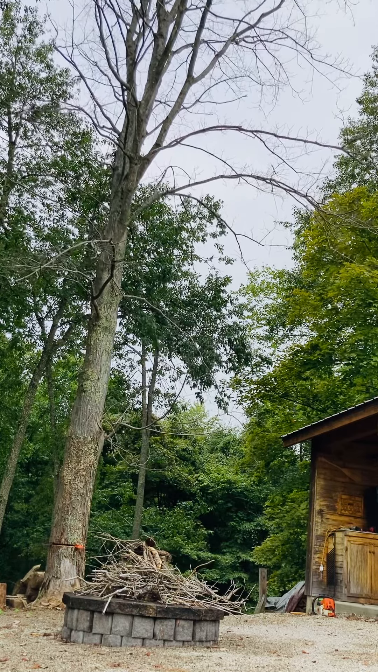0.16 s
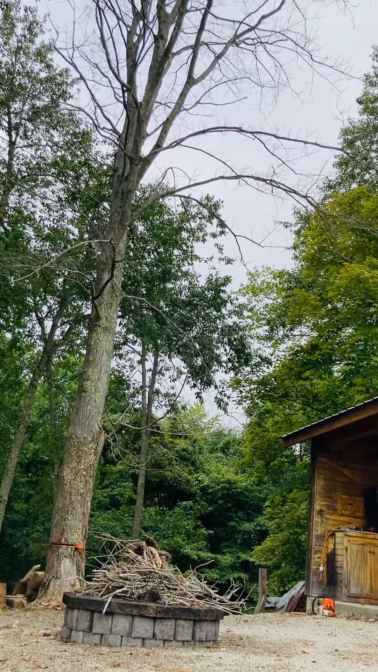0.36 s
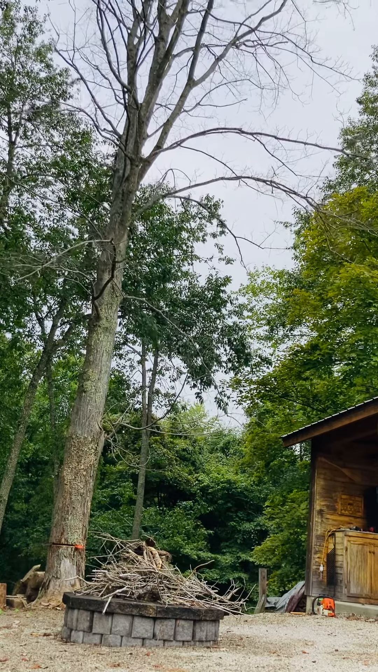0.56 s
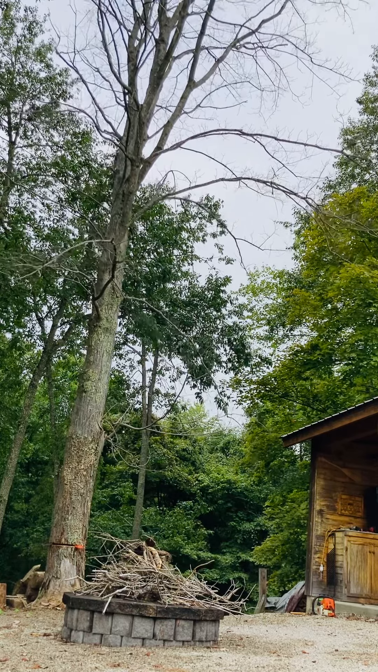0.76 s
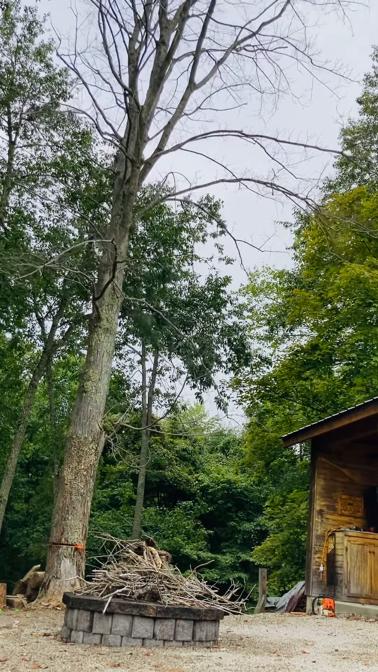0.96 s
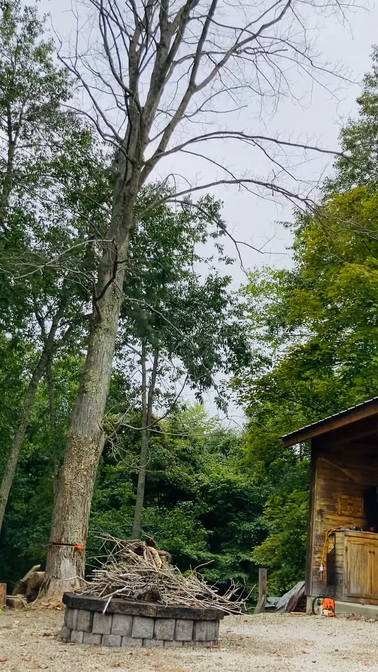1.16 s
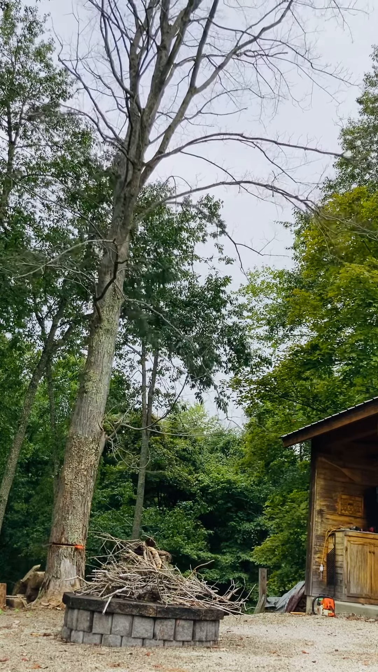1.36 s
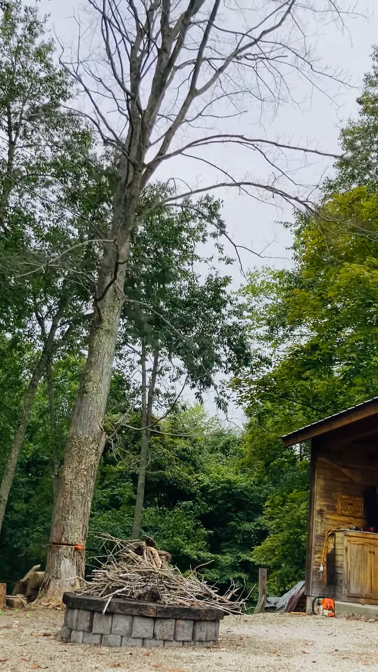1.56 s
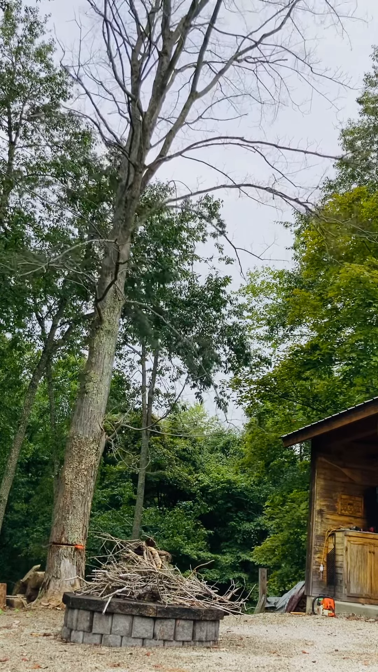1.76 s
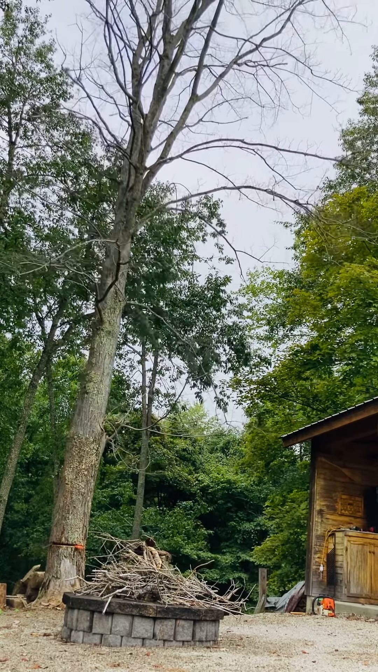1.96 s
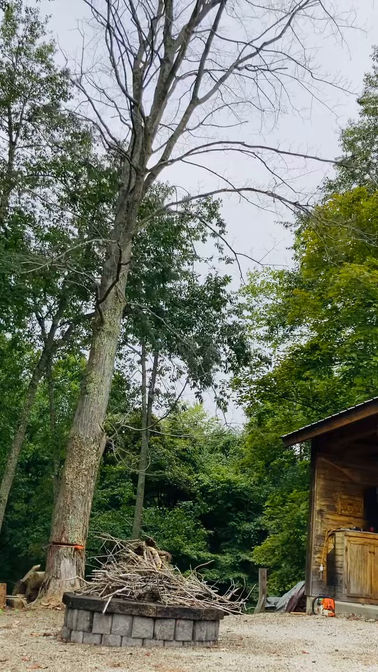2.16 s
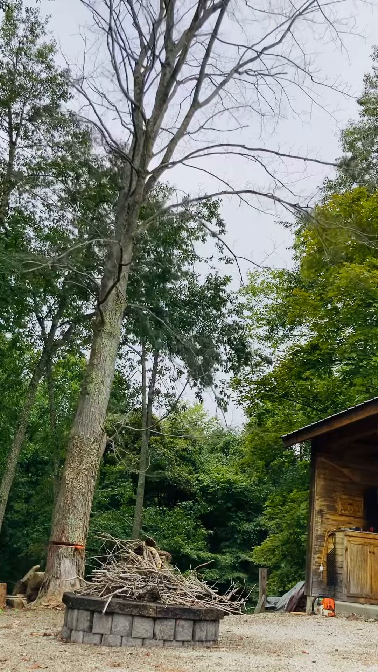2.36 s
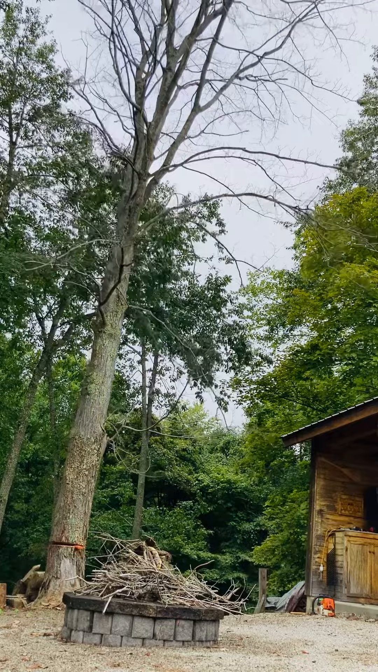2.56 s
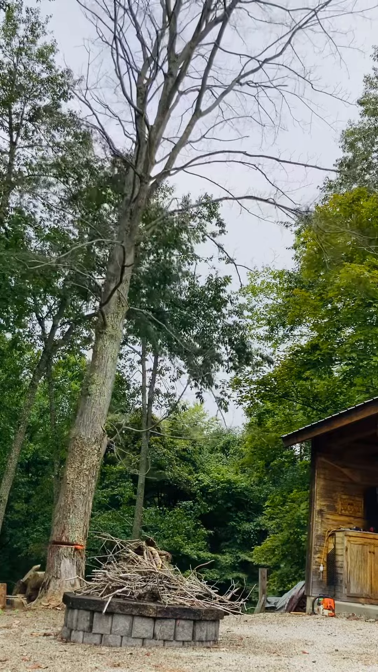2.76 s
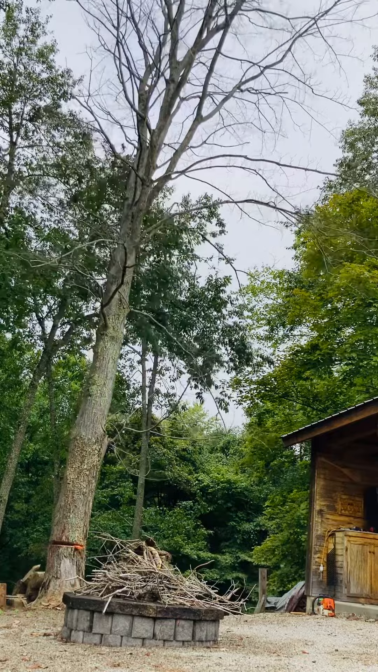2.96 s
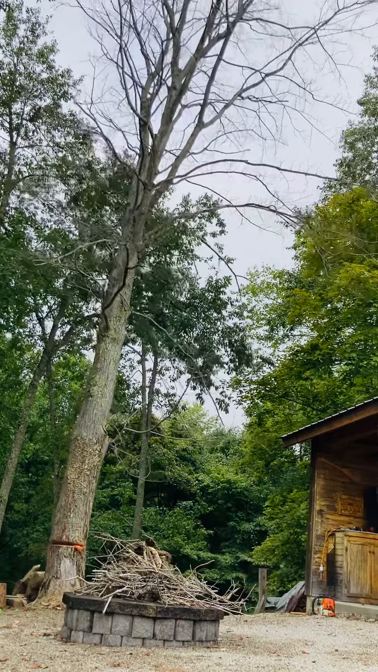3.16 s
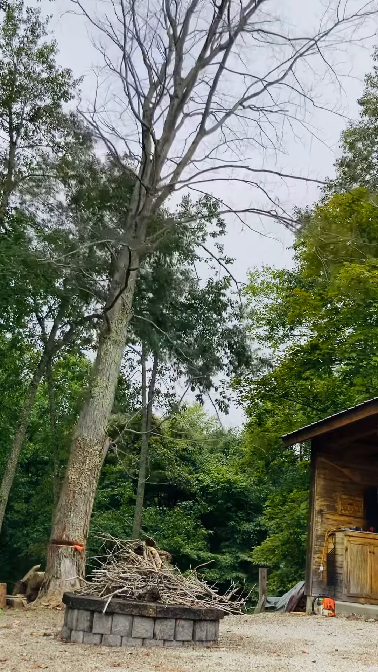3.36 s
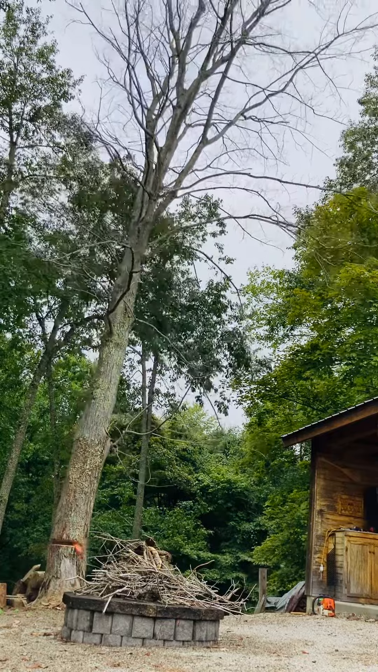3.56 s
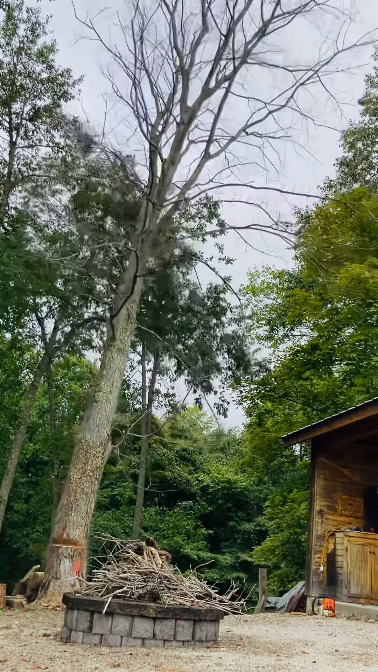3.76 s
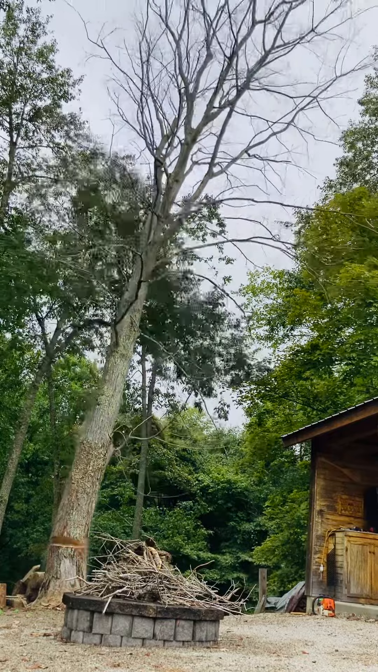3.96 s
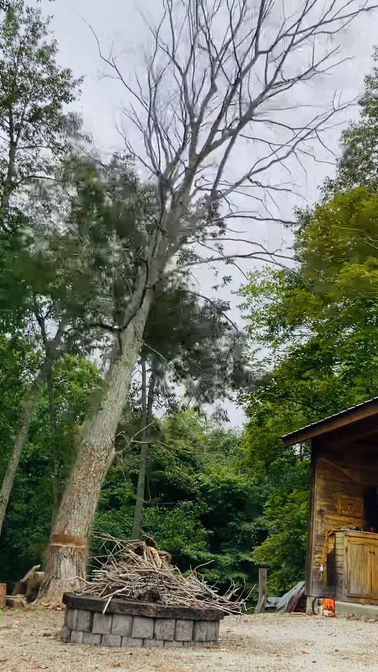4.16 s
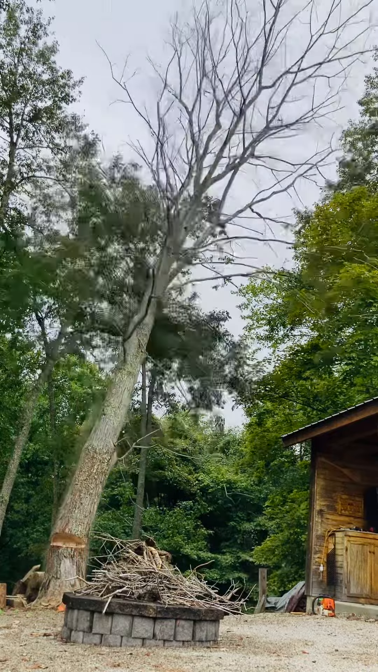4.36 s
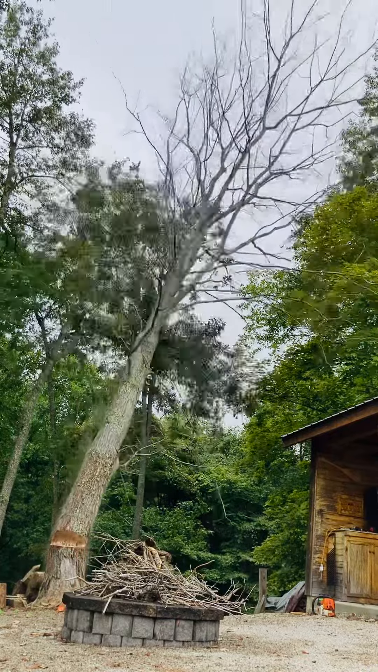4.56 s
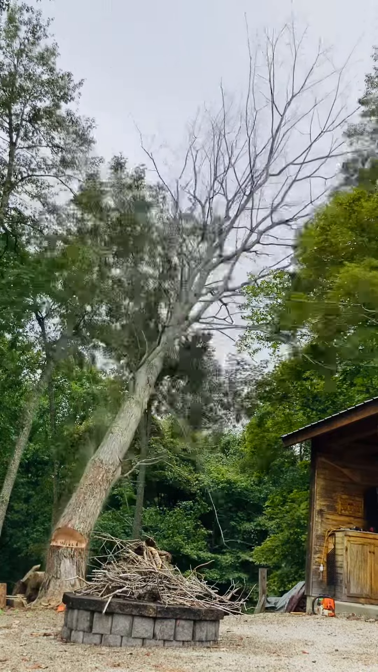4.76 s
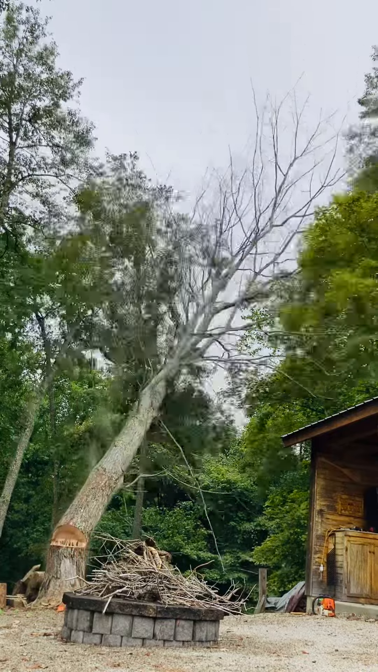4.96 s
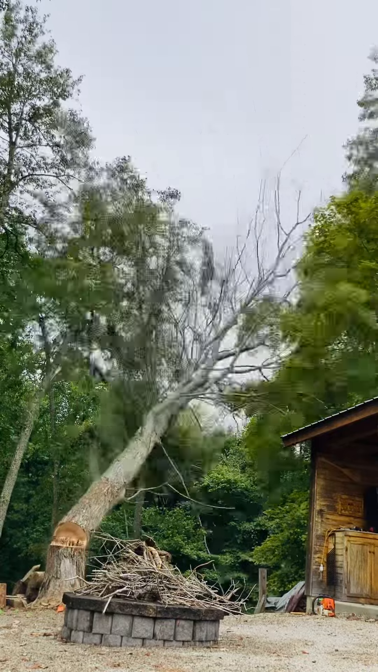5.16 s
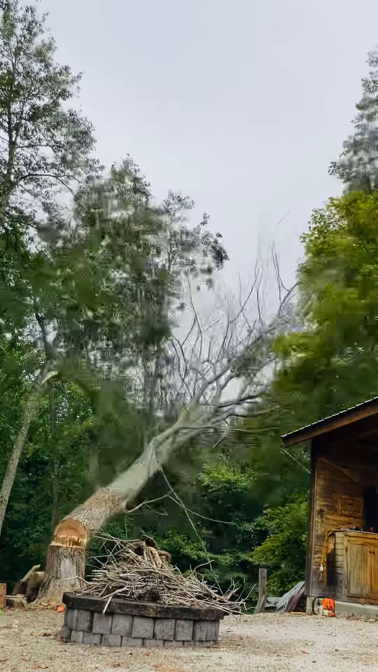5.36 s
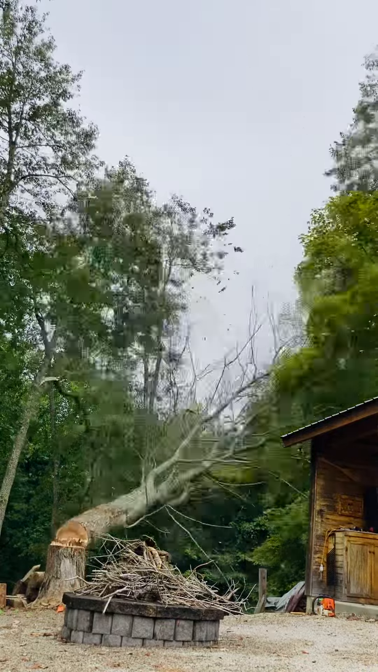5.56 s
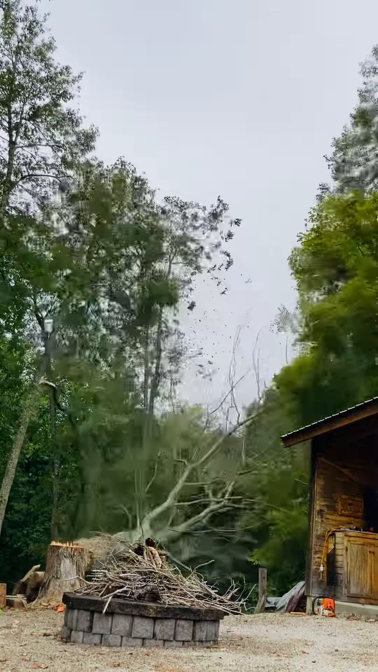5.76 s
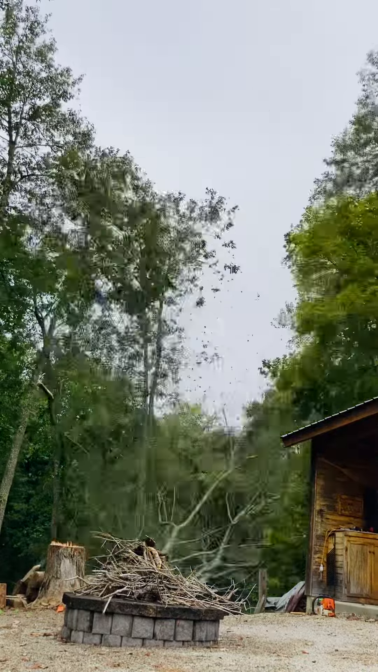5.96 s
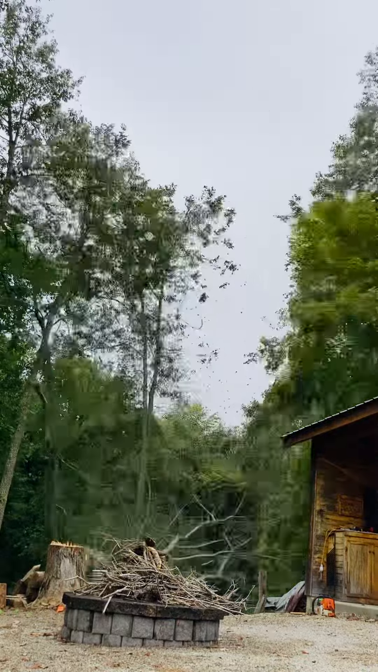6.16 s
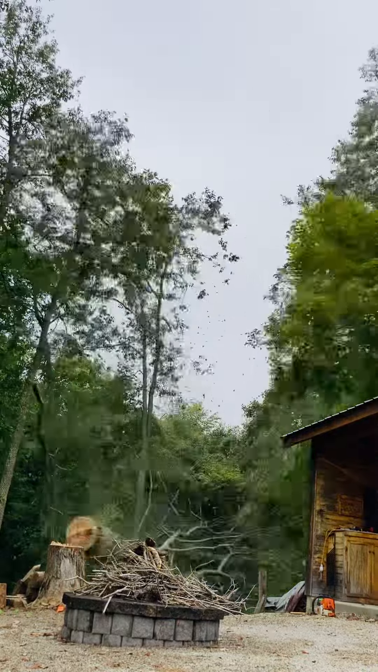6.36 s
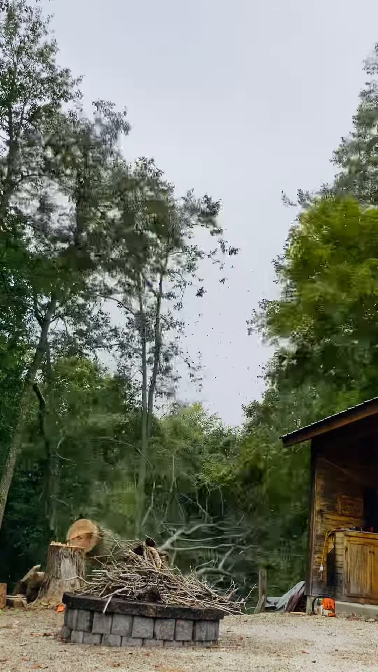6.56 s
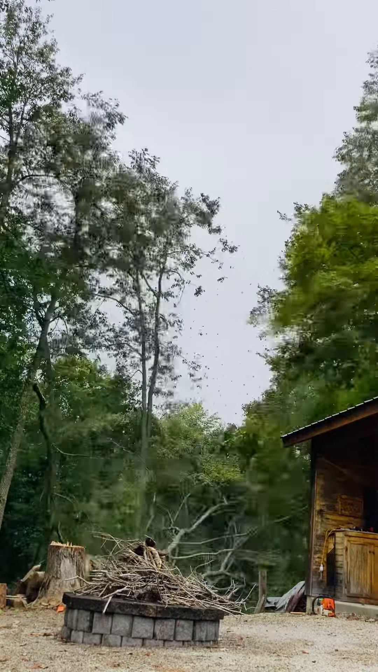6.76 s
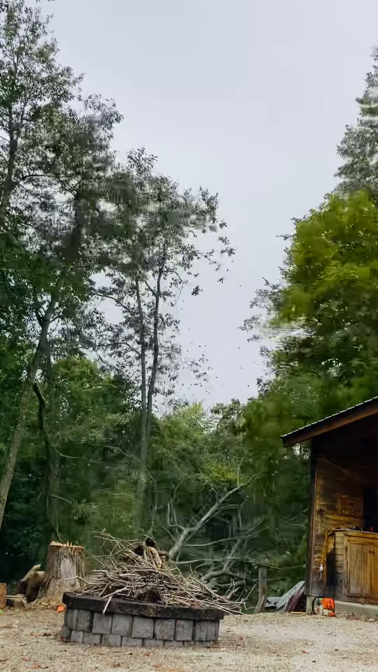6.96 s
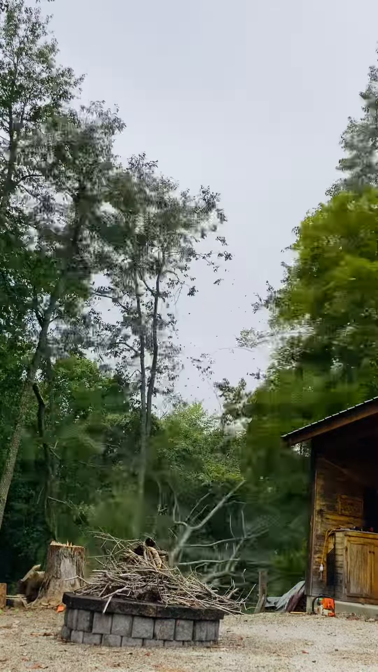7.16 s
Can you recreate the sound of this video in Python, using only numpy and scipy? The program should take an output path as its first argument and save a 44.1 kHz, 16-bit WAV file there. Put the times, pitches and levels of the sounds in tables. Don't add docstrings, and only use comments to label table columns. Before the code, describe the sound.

Sparse wood ticks build to loud snapping, a big trunk falls with swishing foliage and splintering branches, thudding down, then twigs and leaves settle.

```python
import sys
import numpy as np
from scipy import signal
from scipy.fft import rfft, irfft, next_fast_len
from scipy.io import wavfile
from scipy.ndimage import uniform_filter1d

SR = 44100
rng = np.random.default_rng(int(sys.argv[2]) if len(sys.argv) > 2 else 0)


def wav_out(sig):
    wavfile.write(sys.argv[1], SR, np.round(np.clip(np.atleast_2d(sig).T, -1, 1) * 32767).astype(np.int16))


def nominal_scale(level):
    x = np.asarray(level, float) / 20
    return 10 ** x


N = 318402


def evened(x):
    return x / np.sqrt(np.mean(x ** 2) + 1e-20)


def read(points, hz):
    f, value = np.transpose(points)
    return np.interp(np.log(hz + 1), np.log(f + 1), value)


def curve(rows):
    s, value = np.transpose(rows)
    return np.interp(np.arange(N) / SR, s, value)


def swell(s, length, db):
    return db * np.exp(-((np.arange(N) / SR - s) / length) ** 2)


def add(mix, s, sound):
    part = mix[..., max(round(s * SR), 0):][..., :sound.shape[-1]]
    part += sound[..., :part.shape[-1]]


def coloured(x, points):
    size = next_fast_len(x.shape[-1])
    gain = nominal_scale(read(points, np.fft.rfftfreq(size, 1 / SR)))
    return irfft(rfft(x, size) * gain, size)[..., :x.shape[-1]]


# frequency in Hz, likeness 0 to 1.
PORT_LIKENESS = [(60, 0.99), (280, 0.95), (600, 0.55), (1500, 0.27), (3000, 0.54), (5000, 0.2), (9000, 0.6),
                 (15000, 0.13)]


def paired(a, b):
    size = next_fast_len(N)
    same = np.clip(read(PORT_LIKENESS, np.fft.rfftfreq(size, 1 / SR)), 0, 1)
    right = same * rfft(a, size) + np.sqrt(1 - same ** 2) * rfft(b, size)
    return np.array([a, irfft(right, size)[:N]])


def random_hits(per_s, spread_db):
    size = nominal_scale(spread_db * np.minimum(rng.exponential(1, N), 2.5))
    return size * (rng.random(N) < per_s / SR)


def scatter(points, per_s, spread_db, ring_s, hiss, gust_db):
    ring = np.exp(-np.arange(800) / SR / ring_s)
    snaps = signal.oaconvolve(random_hits(per_s, spread_db), ring)[:N]
    gusts = evened(uniform_filter1d(uniform_filter1d(rng.standard_normal(N), 900), 900))
    noise = (hiss + evened(snaps)) * nominal_scale(gust_db * gusts) * rng.standard_normal((2, N))
    return evened(coloured(paired(*noise), points))


def insect():
    hz, width_hz, chirps_per_s, level_db = 7554, 500, 27, -61.5
    throb = (.5 + .5 * np.cos(2 * np.pi * chirps_per_s * np.arange(N) / SR + 1.1)) ** 3
    band = [(hz - 2 * width_hz, -40), (hz - width_hz / 2, -3), (hz, 0),
            (hz + width_hz / 2, -3), (hz + 2 * width_hz, -40)]
    return nominal_scale(level_db) * evened(throb * coloured(rng.standard_normal(N), band))


# order (multiple of the cycle), level in dB rms.
ENGINE_ORDERS = [(3, -50), (6.4, -64), (9, -52), (10, -59), (12, -65), (13, -64), (15, -66), (18, -65),
                 (20, -67), (24, -68)]


def idling_engine():
    cycle_hz = 13.73
    drift = evened(uniform_filter1d(uniform_filter1d(rng.standard_normal((2, N)), 5000), 5000))
    seconds = np.cumsum(1 + .003 * drift[0]) / SR
    hum = sum(nominal_scale(db + 2.0) * np.sin(2 * np.pi * order * cycle_hz * seconds + order ** 2)
              for order, db in ENGINE_ORDERS)
    return nominal_scale(0.83 * drift[1]) * hum


# frequency in Hz, level in dB per Hz.
WOODLAND_AIR = [(25, -33), (45, -14), (100, -4), (170, -4), (330, -13), (500, -20.5), (800, -26.5),
                (1400, -18.5), (2500, -25.5), (5000, -26), (7600, -14), (10000, -26.5), (13500, -27.5),
                (16300, -31)]
# time in seconds, gain in dB.
BACKGROUND_GAIN = [(0, 0), (2.6, 0), (3.6, -7), (4.6, -2), (6.2, -13), (7.2, 4)]


def background():
    air = nominal_scale(-48) * scatter(WOODLAND_AIR, 270, 1.0, 0.0076, 5.7, 1.0)
    return (air + idling_engine() + insect()) * nominal_scale(curve(BACKGROUND_GAIN))


def groan():
    s, half_length_s, hz, width_hz, level_db = 4.5, 0.75, 180, 47, -45
    band = [(hz - 2 * width_hz, -30), (hz - width_hz, -4), (hz, 0),
            (hz + width_hz, -4), (hz + 2 * width_hz, -30)]
    rise = np.exp(-((np.arange(N) / SR - s) / half_length_s) ** 2)
    return nominal_scale(level_db) * rise * evened(coloured(rng.standard_normal(N), band))


def twigs(per_s=400, spread_db=3.5, ring_s=0.0074):
    hits = random_hits(per_s, spread_db)
    limb, t, out = rng.integers(0, 14, N), np.arange(900) / SR, np.zeros((2, N))
    for k, hz in enumerate(np.geomspace(720, 2050, 14)):
        ring = np.exp(-t / ring_s) * np.sin(2 * np.pi * hz * t)
        out[k % 2] += signal.oaconvolve(hits * (limb == k), ring)[:N]
    return evened(paired(out[0] + out[1], out[0] - out[1]))


# time in seconds, tick in dB, knock in dB, knock pitch in Hz.
CROWN_LIMBS = [(4.9008, -16, -23, 1900), (4.9082, -22, -33, 1900), (5.291, -31, -26, 1190),
               (5.335, -26, -20, 1930), (5.702, -27, -31, 840), (5.613, -14, -25, 860),
               (5.641, -19, -26, 900), (4.9037, -11, -21.5, 1160), (5.0329, -35, -18, 1180),
               (5.0977, -26, -18.5, 1730), (5.1237, -19, -24, 1040), (5.1499, -18, -15, 980),
               (5.174, -19, -21, 1270), (5.2326, -31, -22, 1150), (5.3048, -16, -15, 1710),
               (5.3739, -30, -13, 1900), (5.4096, -24, -14, 1980), (5.4464, -31, -46, 1270),
               (5.4846, -11, -19, 1950), (5.5063, -11, -21.5, 1200), (5.5308, -13, -18.5, 1160),
               (5.5375, -14, -17, 1970), (5.5662, -8.5, -21.5, 850), (5.683, -22, -30.5, 1960),
               (5.7233, -16.5, -20.5, 930), (5.83, -36, -24, 1180), (5.5265, -16, -20, 900),
               (5.842, -30, -24, 1490), (5.1835, -24, -19.5, 1710), (5.194, -26, -23.5, 1300),
               (5.105, -28, -22.5, 1010), (5.5785, -17, -20, 1510)]


def rattle():
    fade_s, under_knock_db = 0.05, -12.5
    power, t = np.zeros(N), np.arange(SR // 4) / SR
    for s, _, knock_db, _ in CROWN_LIMBS:
        add(power, s, nominal_scale(2 * (knock_db + under_knock_db)) * np.exp(-2 * t / fade_s))
    return np.sqrt(power)


# frequency in Hz, dB per Hz.
LEAF_COLOUR = [(450, -45), (700, -19), (1900, -2.5), (3200, -4.5), (5000, -3), (6000, -2.5), (7500, -2.5),
               (9200, 1), (11000, -0.5), (13500, -3.5), (15500, -6), (16500, -16.5)]
BRANCH_COLOUR = [(450, -18.5), (700, -8), (1100, -4.5), (1900, -6), (2600, -8.5), (4000, -4.5), (6000, -44)]
SOIL_COLOUR = [(30, -44), (70, -2.5), (170, -2.5), (250, -3), (550, -7.5), (800, -38)]
# frequency in Hz, level in dB.
TICK_COLOUR = [(2000, -19.5), (3300, -1.5), (5500, -3.5), (8000, 3.5), (10000, 5), (12000, 5), (14500, -5),
               (16400, -24)]
# time in seconds, force in dB.
CROWN_SWEEP = [
    (2.4, -49.5),
    (3.69, -53.5),
    (4.25, -42),
    (4.8, -36),
    (5.38, -26),
    (5.85, -31.5),
    (6.17, -25.5),
    (6.53, -36.5),
    (6.78, -40.5),
    (7.22, -39.5),
]
# time in seconds, half length in seconds, rise in dB.
TWIG_BURSTS = [
    (4.1, .25, 8.6),
    (5.53, .07, 12),
]


def fall():
    t, force_db = np.arange(N) / SR, curve(CROWN_SWEEP)
    start_s, end_s, ramp_s, creak_db, creak_rumble_db = 2, 14.5, 0.6, -43, -52
    strain = np.clip(np.minimum(t - start_s, end_s + ramp_s - t) / ramp_s, 0, 1)
    fade = np.clip((t - CROWN_SWEEP[0][0]) / 0.6, 0, 1)

    leaves = nominal_scale(force_db + 4.5) * scatter(LEAF_COLOUR, 1000, 6.1, 0.0048, 2.7, 1.3)

    settle_db = -22 * np.maximum(t - 6.4, 0)
    crash_db = force_db - 6 + swell(5.4, 0.61, 4) + settle_db
    crash = np.hypot(nominal_scale(crash_db), strain * nominal_scale(creak_db))
    branches = crash * scatter(BRANCH_COLOUR, 250, 2.3, 0.0099, 0.56, 2.0)
    knocking = np.hypot(0.44 * crash, rattle()) * twigs()

    land_s, land_length_s = 6.12, 0.27
    down = np.clip((t - land_s) / land_length_s + 1, 0, 1)
    impact_db = swell(land_s, land_length_s, 5.3)
    rebound_db = swell(7.03, .12, 5)
    soil_db = force_db - 15 + 5 * down + impact_db + rebound_db
    shake = np.hypot(nominal_scale(soil_db), strain * nominal_scale(creak_rumble_db))
    ground = shake * scatter(SOIL_COLOUR, 250, 1.2, .008, 2.2, 1.2)

    crackle_db = force_db - 8 + sum(swell(*row) for row in TWIG_BURSTS)
    crackle = nominal_scale(crackle_db) * scatter(TICK_COLOUR, 350, 3.4, 0.00044, 0, 3.5)
    return fade * (leaves + crackle + branches + knocking + ground) + groan()


# start in seconds, end in seconds, level in dB, pitch in Hz.
SQUEALS = [
    (3.579, 3.596, -5, 1460),
    (3.046, 3.063, -27, 1900),
]


def hinge_squeals():
    out = np.zeros(N)
    for start, end, db, hz in SQUEALS:
        t = np.arange(0, end - start, 1 / SR)
        wobble = 2.24 * np.cumsum(rng.standard_normal(1000))[:len(t)] / 10
        level = nominal_scale(db - 19 * (1 - t / t[-1])) * signal.windows.tukey(len(t), .2)
        add(out, start, level * np.sin(2 * np.pi * hz * t + wobble))
    return out


# time in seconds, level in dB, first pitch in Hz, last pitch in Hz, t60 in seconds.
TRUNK_BLOWS = [(2.599, -26, 500, 244, 0.054), (3.595, -5, 300, 65, 0.036), (4.897, -26.5, 216, 150, 0.12),
               (5.97, -22.5, 420, 270, 0.087), (6.0375, -10, 306, 100, 0.044),
               (6.0455, -13, 260, 116, 0.03), (6.0505, -14, 264, 90, 0.04), (6.0645, -10, 170, 59, 0.045),
               (6.133, -13, 266, 120, 0.056), (6.112, -18.5, 490, 360, .04), (6.42, -28.5, 200, 110, .08),
               (6.409, -33, 250, 140, 0.038), (6.127, -17, 350, 120, 0.05), (6.7, -26, 280, 130, 0.044),
               (5.6, -33, 240, 152, 0.087), (6.285, -34, 390, 200, 0.066), (6.46, -29, 374, 204, 0.055),
               (6.8, -22, 203, 82, 0.044), (6.912, -18.5, 166, 60, 0.13), (6.957, -23.5, 71, 41, 0.56),
               (6.957, -24, 520, 410, 0.026), (6.802, -18, 530, 440, .022), (6.908, -42, 520, 400, 0.024),
               (6.029, -18.5, 75, 42, 0.24), (3.068, -28, 203, 91, 0.084), (2.803, -21, 308, 166, 0.037),
               (6.6, -29, 407, 250, 0.06)]


def thuds():
    longest_sink_s = .014
    out, t = np.zeros(N), np.arange(SR // 2) / SR
    for s, db, first_hz, last_hz, t60 in TRUNK_BLOWS:
        crushed = evened(coloured(rng.standard_normal(len(t)), SOIL_COLOUR))
        crunch = 0.59 * np.exp(-t / 0.018) * crushed
        hz = last_hz + (first_hz - last_hz) * np.exp(-t / min(t60 / 6.3, longest_sink_s))
        tone = np.sin(2 * np.pi * np.cumsum(hz) / SR)
        level = nominal_scale(db - 60 * t / t60) * np.minimum(t * first_hz, 1)
        add(out, s, level * (tone + crunch))
    return out


# time
# in seconds, tick in dB.
LONE_FIBRES = [(0.2318, -38), (0.585, -40), (0.8445, -44), (0.879, -36.5), (0.9123, -42), (0.948, -31),
               (0.9865, -38), (1.1307, -35), (1.1573, -37.5), (1.4275, -32), (1.71, -33.5), (1.7568, -31),
               (1.8736, -25), (2.221, -36), (2.5684, -28), (2.8802, -24), (3.1496, -28), (3.2026, -31),
               (3.723, -29), (3.511, -18), (3.084, -17.5), (3.981, -22), (4.017, -30), (4.136, -23),
               (4.1991, -36), (4.228, -24), (4.242, -20.5), (4.303, -19), (4.5073, -25), (3.4751, -24),
               (3.552, -31), (3.745, -34), (3.974, -24), (4.0075, -29), (4.0266, -23.5), (4.903, -20),
               (4.906, -21), (4.9095, -13), (2.7994, -17), (1.436, -40), (5.494, -16), (5.126, -16),
               (4.030, -26), (4.1015, -24), (4.1042, -20), (4.142, -24), (4.169, -28), (4.2343, -23),
               (4.2505, -27), (4.2645, -30), (5.4121, -11.5), (5.753, -16), (5.575, -16), (5.549, -13),
               (2.39, -40), (2.404, -33), (2.498, -30), (3.4535, -15.5)]
# time in
# seconds, tick in dB, knock in dB, thump in dB.
HINGE_TEARS = [(0.0568, -22.5, -34.5, -45), (1.7717, -12.5, -28, -44), (2.2821, -12, -25, -36.5),
               (2.3197, -18, -36.5, -61), (2.4878, -41, -41, -50), (2.5055, -25.5, -40, -63),
               (2.6502, -11.5, -15.5, -28.5), (2.735, -31, -41, -59), (2.771, -14, -24.5, -40),
               (2.7931, -5, -11, -28.5), (2.7982, -24, -19, -16.5), (2.8026, -24, -14.5, -24),
               (2.8715, -14.5, -16.5, -23.5), (2.9011, -17, -45, -32), (3.0631, -12, -10, -12.5),
               (3.0706, -30, -43, -38), (3.0863, -18, -13.5, -15), (3.234, -8, -11, -13.5),
               (3.26, -21, -29, -52), (3.2991, -13.5, -14.5, -21), (3.3408, -18, -25, -45),
               (3.3497, -17, -35, -28), (3.3892, -8, -11, -16), (3.4162, -16, -12, -21),
               (3.4514, -10.5, -14.5, -26.5), (3.518, -16.5, -11.5, -8.5), (3.54, -14.5, -10, -12),
               (3.5923, -16.5, -18, -18.5)]
# time in seconds, tick in dB, knock in dB.
CAUGHT_TWIGS = [(3.7603, -34, -28), (3.7939, -14, -20.5), (3.897, -25, -33), (3.918, -17, -27),
                (3.964, -19, -26), (4.024, -20.5, -27), (4.07, -14, -22.5), (4.0938, -15, -26.5),
                (4.2183, -21, -25), (4.26, -28, -32), (4.294, -22.5, -37), (4.321, -17.5, -34),
                (4.364, -23, -30.5), (4.3975, -14.5, -26), (4.468, -30, -30), (4.502, -25, -49),
                (4.533, -24, -27.5), (4.556, -19, -40.5), (4.744, -24, -29.5), (6.1580, -19, -27),
                (6.2735, -9, -28), (6.5104, -13.5, -36), (6.5211, -16, -31), (6.5244, -9, -31),
                (6.7476, -29, -55), (6.8003, -25, -44), (6.958, -26.5, -54), (7.1372, -25, -56)]


def breaks():
    trunk_hz, limb_hz = 443, 756
    fibre_knock_db = -21.5
    twig_thump_db, limb_thump_db = -8.5, -7.5
    rows = []
    for s, tick in LONE_FIBRES:
        knock = tick + fibre_knock_db
        rows.append((s, tick, knock, None, knock + twig_thump_db, trunk_hz))
    for s, tick, knock, thump in HINGE_TEARS:
        rows.append((s, tick, knock, None, thump, trunk_hz))
    for s, tick, knock in CAUGHT_TWIGS:
        rows.append((s, tick, knock, None, knock + twig_thump_db, trunk_hz))
    for s, tick, knock, hz in CROWN_LIMBS:
        rows.append((s, tick, knock, hz, knock + limb_thump_db, limb_hz))
    return rows


def wavelet(t, at, hz, rise, fall, phase):
    u = t - at
    envelope = np.where(u < 0, np.exp(-(u / rise) ** 2), np.exp(-abs(u) / fall))
    return envelope * np.cos(2 * np.pi * hz * u + phase)


# frequency in Hz, level in dB.
SPLINTER_COLOUR = [(70, -14), (250, -24), (550, -11.5), (1000, -3.5), (1600, -2.5), (2400, -8), (3400, 0.5),
                   (5000, -9.5), (7000, -18)]


def cracks():
    wood_hz, wood_scatter = 1632, 0.65
    out, t, rows = np.zeros(N), np.arange(2000) / SR, breaks()
    chance, grit = rng.random((len(rows), 5)), rng.standard_normal((len(rows), 2, 2000))
    for (s, tick_db, knock_db, hz, thump_db, thump_hz), c, (fine, coarse) in zip(rows, chance, grit):
        hz = hz or wood_hz * (1 + wood_scatter * (c[4] - .5))
        spread = 0.0017 * (1.1 + 1.88 * c[1])
        click = wavelet(t, .0054, 0, .00002, .00002, 0)
        fizz = .25 * fine * wavelet(t, .0054, 0, .0001, .25 * spread, 0)
        tick = coloured(click + fizz, TICK_COLOUR)
        spray = coloured(coarse * wavelet(t, 0.0046, 0, 0.00093, 1.87 * spread, 0), SPLINTER_COLOUR)
        knock = wavelet(t, .0052, hz, 0.00033, 0.00089, 2 * np.pi * c[0])
        knock = knock + 0.5 * spray / abs(spray).max()
        thump = wavelet(t, 0.00761, thump_hz * (0.93 + 0.42 * c[2]), 0.0016, 0.001, 2 * np.pi * c[3])
        sound = nominal_scale(tick_db + 10.0) * tick / abs(tick).max()
        sound = sound + nominal_scale(knock_db + 6.5) * knock + nominal_scale(thump_db + 3) * thump
        add(out, s - .0040, sound)
    return out


# frequency in Hz, t60 in seconds.
ECHO_DECAY = [(100, 0.23), (500, 0.089), (1500, 0.37), (4000, 0.35), (10000, 0.28)]
# frequency in Hz, level in dB.
ECHO_COLOUR = [(100, 12), (500, 3), (1500, -0.5), (3500, -2.5), (5000, 3), (8000, -4), (10000, -7.5),
               (13000, -7.5)]


def clearing(x):
    taps = np.zeros((2, N))
    at = np.arange(0, N - 20, 20) + rng.integers(0, 20, (2, (N - 1) // 20))
    np.put_along_axis(taps, at, rng.choice([-1., 1.], at.shape), 1)
    length = 22000
    tails = paired(*taps)[:, :3 * length].reshape(2, 3, length) * (np.arange(length) > 390)
    hz, t, z = signal.stft(tails, SR, nperseg=256)
    decay_db = read(ECHO_COLOUR, hz)[:, None] - 60 * t / read(ECHO_DECAY, hz)[:, None]
    tail = signal.istft(z * nominal_scale(decay_db), SR, nperseg=256)[1]
    late = np.arange(tail.shape[-1]) / SR - .008
    tail = tail * (1 + .8 * np.exp(-(late / .006) ** 2))
    tail = nominal_scale(-6.5) * tail / np.linalg.norm(tail[0, 0])
    for s, db in ((.0076, -9), (.0095, -24), (.0125, -21), (.016, -30)):
        add(tail, s, nominal_scale([db]))
    turn = np.cos(2 * np.pi * (np.arange(N) / SR * 1.7 + np.arange(3)[:, None] / 3))
    share = (turn == turn.max(0)) * x
    return signal.oaconvolve(share[None], tail, axes=2)[..., :N].sum(1)


def scene():
    snaps, blows = cracks(), thuds() + hinge_squeals()
    return background() + fall() + blows + snaps + clearing(snaps + 0.15 * blows)


# 0 for sum or 1 for difference of the two channels, low edge in
# Hz, high edge in Hz, edge scatter in Hz, share of blocks 0 to 1.
WEAK_BANDS = [(0, 10950, 12500, 400, 1), (0, 13600, 22050, 1500, .06), (0, 5400, 6000, 300, .3),
              (0, 4600, 4900, 200, .15), (0, 15500, 22050, 450, 1), (1, 7700, 9400, 250, 1),
              (1, 13800, 22050, 150, 1), (1, 3700, 4000, 250, .1)]


def drop_bands(x, jump_db=11.0):
    sum_and_difference = np.array([x[0] + x[1], x[0] - x[1]]) / 2
    hz, t, z = signal.stft(sum_and_difference, SR, nperseg=1024, noverlap=768)
    block = (t * SR + 29).astype(int) // 1024
    treble = uniform_filter1d(np.diff(x[0], 2, append=[0, 0]) ** 2, 64)
    before = np.roll(uniform_filter1d(treble, 512), 300)
    attacks = np.flatnonzero(treble > before * nominal_scale(2 * jump_db))
    sharp = np.isin(block, (attacks + 29) // 1024)
    chance = rng.random((block[-1] + 1, len(WEAK_BANDS), 3))[block]
    for k, (side, low, high, edge, share) in enumerate(WEAK_BANDS):
        low = low + edge * (2 * chance[:, k, 0] - 1)
        high = high + edge * (2 * chance[:, k, 1] - 1)
        inside = (hz[:, None] > low) & (hz[:, None] < high)
        z[side][inside & (chance[:, k, 2] < share) & ~sharp] = 0
    big = np.flatnonzero(treble > before * nominal_scale(2 * jump_db + 16))
    after_big = np.isin(block - 1, np.unique((big + 29) // 1024))
    spent = after_big & ~sharp & (rng.random(block[-1] + 1)[block] < .4)
    z[:, hz > 12400] *= ~spent
    mid, side = signal.istft(z, SR, nperseg=1024, noverlap=768)[1][:, :N]
    return np.array([mid + side, mid - side])


def roll_off(x):
    return signal.sosfilt(signal.butter(12, 17010, fs=SR, output="sos"), x)


# frequency in Hz, lead in radians.
PORT_LEAD = [(0, 0), (200, 0), (430, -.3), (1030, .6), (1400, .3), (2600, 1.2), (4800, 2.8), (6000, 3.4),
             (7700, 5.9), (9400, 6.6), (11000, 9.1), (12300, 9.7), (13800, 12.2), (16600, 12.8)]
# frequency in Hz, difference in dB.
PORT_TILT = [(60, 1.5), (110, -2), (200, 1), (380, -3.5), (700, -4.5), (1290, -0.5), (2380, -2), (4400, 0),
             (8120, 0.5), (15000, 0.5)]


def record(dry):
    edge_hz, ceiling = 16600, .88
    size = next_fast_len(N)
    hz = np.fft.rfftfreq(size, 1 / SR)
    lead, tilt_db = np.interp(hz, *np.transpose(PORT_LEAD)), read(PORT_TILT, hz)
    ports = np.array([nominal_scale(tilt_db / 2), nominal_scale(-tilt_db / 2) * np.exp(-1j * lead)])
    heard = irfft(rfft(dry, size) * ports, size)
    limited = ceiling * np.tanh(heard / ceiling)
    edged = irfft(rfft(limited) * (hz < edge_hz), size)[:, :N]
    mix = drop_bands(edged)
    return roll_off(mix)


dry = scene()
out = record(dry)
wav_out(out)
```